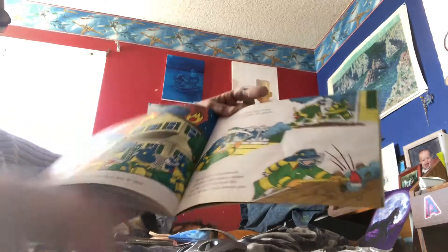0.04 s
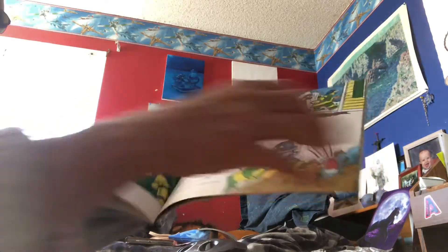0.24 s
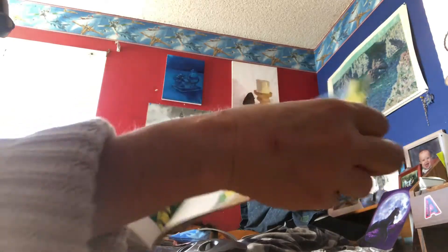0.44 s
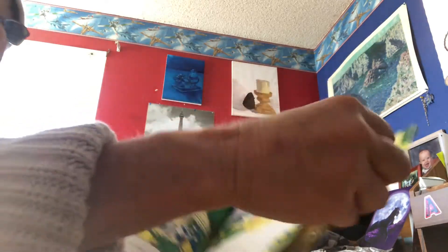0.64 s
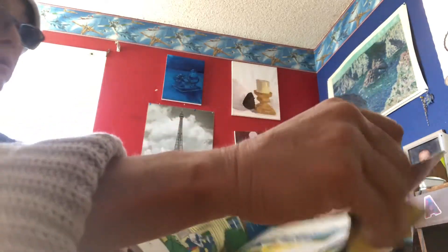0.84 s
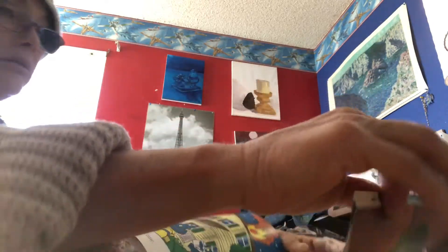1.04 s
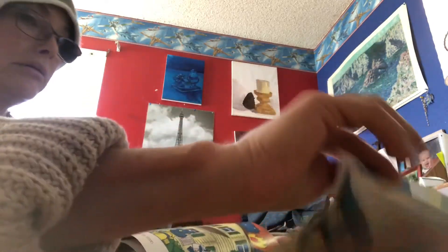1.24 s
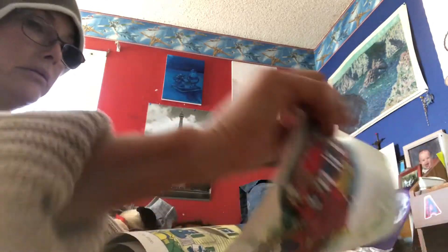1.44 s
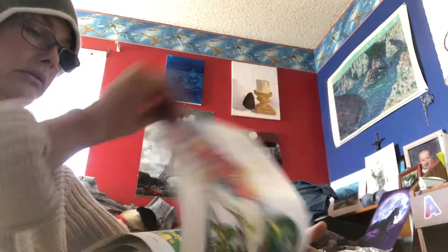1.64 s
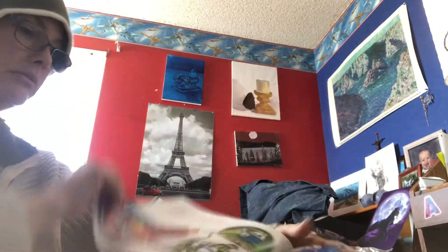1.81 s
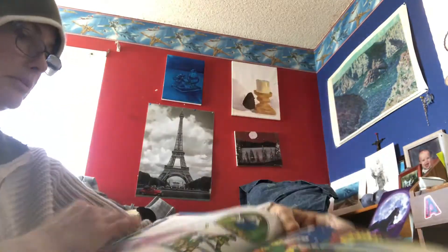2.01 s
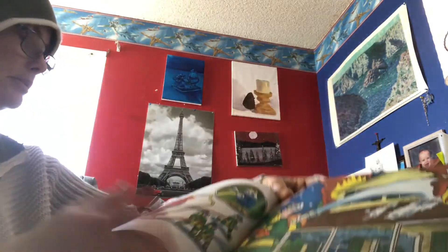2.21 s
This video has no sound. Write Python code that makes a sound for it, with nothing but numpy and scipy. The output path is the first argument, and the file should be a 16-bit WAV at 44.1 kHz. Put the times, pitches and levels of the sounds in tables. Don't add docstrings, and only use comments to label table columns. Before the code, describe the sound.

A glossy picture-book page is turned by hand, rustling, crinkling, then cracking sharply over

```python
import sys
import numpy as np
from scipy import signal
from scipy.fft import rfft, irfft
from scipy.io import wavfile
from scipy.ndimage import uniform_filter1d

SR = 44100
rng = np.random.default_rng(int(sys.argv[2]) if len(sys.argv) > 2 else 0)


def unload_audio(sound):
    columns = np.transpose(np.atleast_2d(sound))
    steps = np.round(np.clip(columns, -1, 1) * 32767)
    wavfile.write(sys.argv[1], SR, steps.astype(np.int16))


def volts(x):
    e = np.asarray(x, float) / 20
    return 10 ** e


N = 100062


def evened(x):
    return x / np.sqrt(np.mean(x ** 2) + 1e-20)


def add(mix, s, sound):
    part = mix[max(round(s * SR), 0):][:len(sound)]
    part += sound[:len(part)]


def steep(x, hz, kind, order=2):
    return signal.sosfilt(signal.butter(order, hz, kind, fs=SR, output="sos"), x)


def colour(x, points, tilt_db=0):
    hz = np.fft.rfftfreq(len(x), 1 / SR) + 1
    f, db = np.transpose(points)
    curve_db = np.interp(np.log(hz), np.log(f), db)
    tilted_db = curve_db + tilt_db * np.log2(hz / 1000 + 0.42)
    return evened(irfft(rfft(x) * volts(tilted_db), len(x)))


def ring(x, hz, width):
    turn = np.exp(2j * np.pi * np.cumsum(hz * np.ones(len(x))) / SR)
    r = np.exp(-np.pi * width / SR)
    return 2 * (turn * signal.lfilter([1 - r], [1, -r], x / turn)).real


def hump(count, rising):
    u, peak = np.arange(count) / count, np.clip(rising, .03, .9)
    return np.sin(np.pi / 2 * np.minimum(u / peak, (1 - u) / (1 - peak))) ** 1.53


def grains():
    slips_per_s, spread_db, clump_db, smooth = 5000, 2.0, 2.0, 1.6
    size = volts(spread_db * np.minimum(rng.exponential(1, N), 5))
    slips = size * (rng.random(N) < slips_per_s / SR)
    drift = uniform_filter1d(rng.standard_normal(N), size=300)
    clumps = evened(uniform_filter1d(drift, size=300))
    return evened(volts(clump_db * clumps) * (evened(slips) + smooth) * rng.standard_normal(N))


def patchy(x):
    patch_db = 3.0
    z = signal.stft(x, nperseg=256)[2]
    field = uniform_filter1d(rng.standard_normal(z.shape), size=5, axis=0)
    field = evened(uniform_filter1d(field, size=9, axis=1))
    return evened(signal.istft(z * volts(patch_db * field), nperseg=256)[1][:N])


# frequency in Hz, level in dB per Hz.
HUSH_COLOUR = [(15, -42), (25, 6), (170, -9), (427, -5.5), (695, -12.5), (4140, -21), (4490, -28),
               (5280, -20), (16000, -30.5)]


def hush():
    return volts(-74) * colour(rng.standard_normal(N), HUSH_COLOUR)


# time in seconds, level in dB.
HANDLING_LEVELS = [(0, -77), (.78, -71.5), (.99, -62), (1.14, -63), (1.229, -64), (1.3, -69), (1.4, -56.5),
                   (1.59, -65), (1.76, -65.5), (1.951, -70.5), (2.26, -75.5)]


def rumble():
    s, db = np.transpose(HANDLING_LEVELS)
    level = volts(np.interp(np.arange(N) / SR, s, db))
    return level * evened(steep(grains(), [60, 198], "band"))


# frequency in Hz, level in dB per Hz.
PAPER_COLOUR = [(88, -61), (150, -9), (494, 2.5), (979, 3.5), (1340, 1), (1660, -2), (2810, -10),
                (5570, -21), (16000, -53)]

# start in seconds, length in seconds, level in dB,
# tilt in dB per octave, share of the length spent rising.
SLIDING_STROKES = [(0, 0.27, -73, 7.5, 0.059), (0.106, 0.14, -69.5, 9.5, 0.5),
                   (0.223, 0.24, -70.5, 6, 0.095), (0.437, 0.13, -64.5, 6.5, 0.37),
                   (0.616, 0.072, -64, 8.5, 0.13), (0.674, 0.056, -67, 3, 0.39),
                   (0.71, 0.25, -52.5, 5.5, 0.15), (0.843, 0.37, -54, 5.5, 0.41),
                   (1.07, 0.13, -56.5, 6, 0.8), (1.19, 0.099, -47.5, 2, 0.6),
                   (1.261, 0.073, -52, 5.5, 0.58), (1.309, 0.074, -46, 6.5, .08),
                   (1.361, 0.093, -44.5, -0.5, 0.46), (1.479, 0.072, -49.5, 3.5, 0.87),
                   (1.542, 0.15, -60.5, 5, 0.16), (1.689, 0.056, -37.5, -10, 0.15),
                   (1.738, 0.097, -41, -4, 0.091), (1.817, 0.069, -47.5, 3.5, 0.19),
                   (1.896, 0.067, -57.5, 8.5, 0.6), (1.958, 0.078, -47.5, 8, 0.051),
                   (2.001, 0.13, -55, 11.5, 0.43), (2.069, 0.15, -53, 6.5, 0.41),
                   (2.173, 0.13, -62, 6.5, 0.37), (1.425, 0.08, -68.5, 1.5, 0.29),
                   (0.543, 0.092, -75.5, 6, .4), (1.86, 0.058, -63, 4, 0.66)]


def strokes():
    grit, out = patchy(grains()), np.zeros(N)
    for s, length, db, tilt_db, rising in SLIDING_STROKES:
        piece = np.roll(grit, -round(s * SR))[:round(length * SR)]
        add(out, s, volts(db) * hump(len(piece), rising) * colour(piece, PAPER_COLOUR, tilt_db))
    return out


# start in seconds, peak in dB, starting pitch in Hz, cycles until it dies.
KINK_POPS = [(.1216, -32, 2840, 1.5), (.1221, -40, 1520, 1.5), (0.8, -39.5, 4520, 7.9),
             (1.6525, -36, 4240, 4.1), (1.6, -29.5, 870, 2.5), (0.14, -53, 2150, 1.5),
             (1.6914, -18.5, 1340, 1), (1.7222, -21, 1500, 1.8), (1.7453, -17.5, 3330, 2.3),
             (1.7497, -17.5, 1400, 2.03), (1.7525, -21, 1500, 2), (1.7625, -25.5, 1300, 2.1),
             (1.6518, -19, 1880, 1.5), (1.2, -37.5, 1150, 2.3), (1.3555, -34.5, 1500, 1.5),
             (1.8255, -26, 2200, 1.7), (.9315, -44, 1200, 3.3), (1.5625, -38, 970, 1.8),
             (1.7, -41, 1140, 3.3), (1.0115, -28, 1770, 1.8)]


def pops():
    rise_turns, sag = 0.57, 0.122
    out, t = np.zeros(N), np.arange(800) / SR
    for s, db, hz, cycles in KINK_POPS:
        turns = np.log(1 + sag * hz * t) / sag
        shape = np.minimum(turns / rise_turns, 1) * np.exp(-turns / cycles)
        add(out, s, volts(db) * shape * np.sin(2 * np.pi * turns))
    return out


# peak time in seconds, level in dB, top frequency in Hz.
COAT_SPECKS = [(1.556, -49, 12000), (1.579, -49, 13000), (1.6175, -41, 8500), (1.651, -35, 9000),
               (1.619, -38, 9000), (1.656, -50, 9000), (1.962, -58, 9000), (0.122, -52, 12000),
               (.47, -63, 16000), (.503, -58, 16000), (0.532, -56, 16000), (1.056, -47, 16000),
               (1.068, -60, 16000), (1.159, -42.5, 16000), (1.19, -44.5, 16000), (1.313, -45.5, 16000),
               (1.324, -45, 16000), (1.333, -41, 16000), (1.359, -32.5, 16100), (1.692, -38.5, 11900),
               (1.722, -41, 11000), (1.8248, -37, 16000), (1.93, -47, 16000), (1.603, -55, 10000),
               (1.734, -49, 10000)]


def specks():
    rise_s, fall_s, lead_s = 0.00033, 0.00086, .002
    out, t = np.zeros(N), np.arange(400) / SR - lead_s
    noise = rng.standard_normal((len(COAT_SPECKS), len(t)))
    for (s, db, top_hz), z in zip(COAT_SPECKS, noise):
        shape = np.exp(-abs(t) / np.where(t < 0, rise_s, fall_s))
        tick = steep(steep(z, 6660, "high"), top_hz, "low")
        add(out, s - lead_s, volts(db) * shape * tick)
    return out


# start in seconds, level in dB, starting pitch in Hz,
# wobbles until it dies.
PAGE_FLAPS = [(0.7995, -38, 183, 1.5), (.7765, -40.5, 390, 1.4), (1.965, -40, 380, 1.9),
              (1.8, -45, 309, 1.9), (3.2, -44, 320, 1.3), (1.6035, -40, 460, 1.4),
              (1.6245, -31.5, 400, 1.2), (1.2, -47, 280, 1), (1.694, -29, 430, 1.1), (2.075, -54, 584, 3),
              (.825, -44.5, 129, 4.2), (1.07, -44, 290, 0.99), (1.163, -52, 180, 2.3), (1, -48, 150, 3.3),
              (1.757, -41.5, 100, 0.94), (0.36, -59, 300, 1.8), (0.98, -46.5, 430, 2),
              (1.349, -45.5, 307, 1.1), (1.582, -35.5, 400, 2.3), (1.6185, -19, 570, 1),
              (1.6545, -20.5, 474, 0.74), (1.162, -33.5, 417, 1.2), (1.752, -27, 480, 2.6),
              (1.095, -50.5, 146, 4.8), (1.7, -28.5, 610, 0.62)]


def flaps():
    fall_turns = 1.56
    out, t = np.zeros(N), np.arange(6000) / SR
    for s, db, hz, wobbles in PAGE_FLAPS:
        pitch = hz * (0.62 + 0.44 * np.exp(-t * hz / fall_turns))
        turns = np.cumsum(pitch) / SR
        shape = np.minimum(t * hz / 0.17, 1) * np.exp(-t * hz / wobbles)
        add(out, s, volts(db) * shape * np.sin(2 * np.pi * turns))
    return out


# start in seconds, length in seconds, level in dB.
GLOSSY_WIPES = [
    (0.465, 0.086, -74.5),
    (0.722, 0.048, -85),
    (1.046, 0.1, -73),
    (1.235, 0.2, -69.5),
    (1.51, 0.029, -64),
    (1.956, 0.066, -66),
    (2.007, 0.11, -74),
]


def wipes():
    edge_s = 0.0099
    out, hiss = np.zeros(N), evened(steep(grains(), 4500, "high"))
    for s, length, db in GLOSSY_WIPES:
        t = np.arange(0, length, 1 / SR)
        shape = np.minimum(np.minimum(t, length - t) / edge_s, 1)
        add(out, s, volts(db) * shape * hiss[round(s * SR):][:len(t)])
    return out


# centre in seconds, length in seconds, level in dB,
# pitch in Hz, tilt in dB per octave.
EDGE_SCUFFS = [(0.486, .012, -65.5, 1100, 22), (0.531, 0.01, -64, 2850, -19), (1.055, .009, -50, 1610, 19),
               (1.333, .02, -52.5, 4500, -10), (1.359, 0.005, -35, 4060, 6.5),
               (1.355, 0.008, -45.5, 4500, 5.5), (1.556, 0.008, -54.5, 3550, 13.5),
               (1.729, .009, -40, 2220, -7), (1.7473, 0.002, -36.5, 3000, 1.5),
               (1.75, .011, -28.5, 2480, 6), (1.755, .013, -33, 1150, 4), (1.058, 0.005, -51, 3050, 6),
               (1.8268, 0.0025, -40, 5550, 7.5), (1.965, .009, -48.5, 2440, -2),
               (2.1125, .008, -43, 2530, 9.5)]


def scuffs():
    out, grit = np.zeros(N), grains()
    for s, length, db, hz, tilt_db in EDGE_SCUFFS:
        piece = np.roll(grit, -round(s * SR))[:4096]
        piece = colour(piece, PAPER_COLOUR, tilt_db)
        piece = 1.01 * steep(piece, min(2.5 * hz, 15900), "low", order=3)
        width = 0.32 * hz
        piece = piece + evened(ring(ring(piece, hz, width), hz, width))
        count = round(length * 1.965 * SR)
        burst = piece[500:500 + count] * hump(count, 0.42) ** 2.14
        add(out, s - length * .84, volts(db) * evened(burst))
    return out


# start in seconds, peak in dB, starting
# pitch in Hz, tick in dB against the chirp.
CREASE_SNAPS = [(0.627, -46, 640, -16), (0.772, -36.5, 635, 0), (0.884, -38, 960, -2),
                (0.96, -36.5, 734, -18), (0.991, -34.5, 783, 4), (1.009, -33.5, 760, 3),
                (1.157, -26.5, 1062, -0.5), (1.189, -29, 800, -4.5), (1.311, -43, 940, 4),
                (1.531, -36.5, 883, -11), (1.551, -33.5, 850, -9), (1.577, -29.5, 850, -1),
                (1.615, -19, 815, -6.5), (1.636, -46, 1280, -21), (1.65, -22, 942, 2),
                (1.724, -26.5, 1016, 4), (1.8238, -33.5, 1155, 10), (1.928, -38.5, 750, 5),
                (1.962, -35.5, 842, -27),
                (1.5726, -33.5, 1250, -3),
    (1.6895, -31.5, 1450, 14.5),
    (1.6935, -15, 1076, 3.5),
]



def snaps():
    rise_s, late_s, tick_s = 0.002465, 0.00027, 0.003
    cycles, pitch_fall, overshoot = 1.3, 0.93, 1.372
    events = CREASE_SNAPS
    out, t = np.zeros(N), np.arange(1500) / SR
    noise = rng.standard_normal((len(events), len(t)))
    rise = np.minimum(t / rise_s, 1) ** 2
    for (s, db, hz, tick_db), z in zip(events, noise):
        falling_t = np.maximum(t - 0.79 * rise_s, 0)
        pitch = overshoot * hz / (1 + pitch_fall * hz * falling_t / 2)
        turns = np.cumsum(pitch) / SR
        fade = np.exp(-(np.maximum(t - rise_s, 0) / (cycles / hz)) ** 0.87)
        chirp = rise * fade * np.sin(2 * np.pi * turns)
        dry_noise = evened(steep(colour(z, PAPER_COLOUR, 7), [1100, 4230], "band"))
        tick = rise * np.exp(-t / tick_s) * dry_noise
        add(out, s + late_s, volts(db) * (chirp + volts(tick_db - 5.5) * tick))
    return out


# start in seconds, length in seconds, level in dB,
# pitch in Hz, end pitch in Hz, sharpness as a plain factor.
AIR_POCKETS = [(0.741, 0.13, -53.5, 1534, 1100, 2.3), (0.822, .13, -52, 1360, 1035, 1.9),
               (0.706, 0.12, -60, 2970, 2700, 0.94), (1.207, 0.11, -57, 1520, 1400, 0.73),
               (1.398, 0.061, -47, 1060, 1100, 1.15), (1.69, 0.022, -27.5, 1030, 1050, 1.4),
               (1.748, 0.058, -41.5, 1130, 990, 1), (2.103, 0.038, -45, 2830, 890, 1.05),
               (2.201, 0.055, -59, 2390, 2330, 0.65), (1.507, 0.055, -60, 1490, 1420, 0.55),
               (1.707, 0.025, -37, 1140, 1050, 1.3)]


def pockets():
    out, grit = np.zeros(N), grains()
    for s, length, db, hz, end_hz, sharp in AIR_POCKETS:
        piece = np.roll(grit, -round(s * SR))[:round(length * SR)]
        glide = np.geomspace(hz, end_hz, len(piece))
        width = 0.38 * np.sqrt(hz * 1000) / sharp
        sung = evened(ring(ring(piece, glide, width), glide, width))
        add(out, s, volts(db) * hump(len(piece), 0.3) * sung)
    return out


def room(x):
    t60_low_s, t60_high_s = 0.29, 0.14
    taps = np.zeros(SR // 2)
    at = np.arange(120, len(taps) - 20, 20)
    taps[at + rng.integers(0, 20, len(at))] = rng.choice([-1., 1.], len(at))
    hz, t, z = signal.stft(taps, SR, nperseg=256)
    t60 = np.interp(np.log(hz + 1), np.log([500, 8000]), [t60_low_s, t60_high_s])
    tail = signal.istft(z * volts(-60 * t / t60[:, None]), SR, nperseg=256)[1]
    return signal.fftconvolve(x, tail / np.linalg.norm(tail))[:N]


def scene():
    sliding = strokes()
    crisp = steep(snaps() + scuffs(), 154, "high")
    page = sliding + crisp + flaps() + pockets() + pops() + specks() + wipes()
    mix = page + volts(-15) * room(page) + rumble() + hush()
    return mix[None]


def roll_off(x):
    return signal.sosfilt(signal.butter(12, 16610, fs=SR, output="sos"), x)


def record(dry):
    heard = steep(dry, 52, "high", order=3)
    band_limit = signal.firwin(255, 15900, fs=SR)[None]
    mix = signal.oaconvolve(heard, band_limit, "same")
    return roll_off(mix)


dry = scene()
out = record(dry)
unload_audio(out)
```